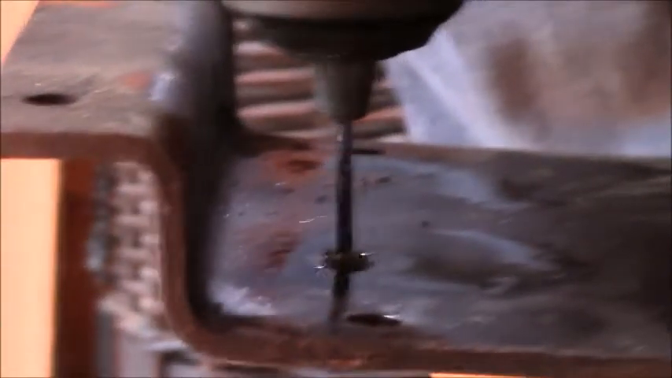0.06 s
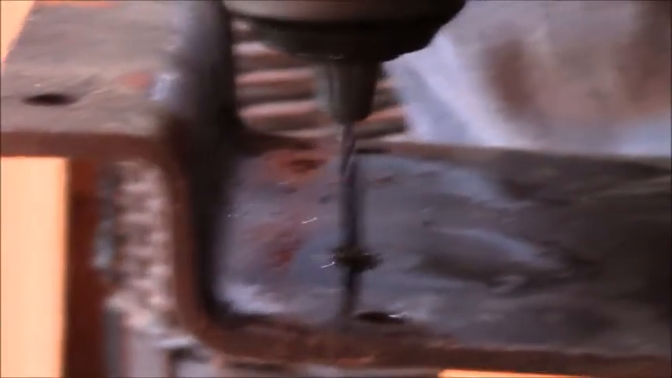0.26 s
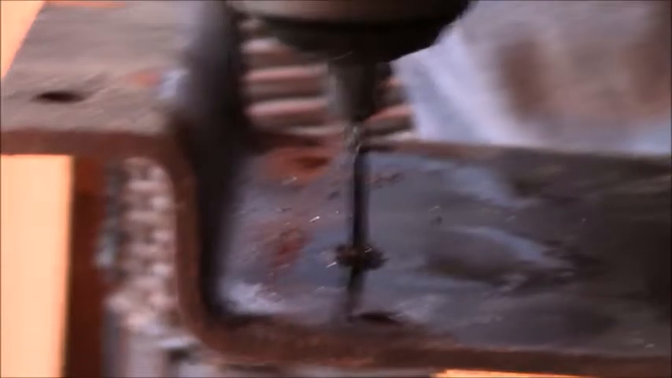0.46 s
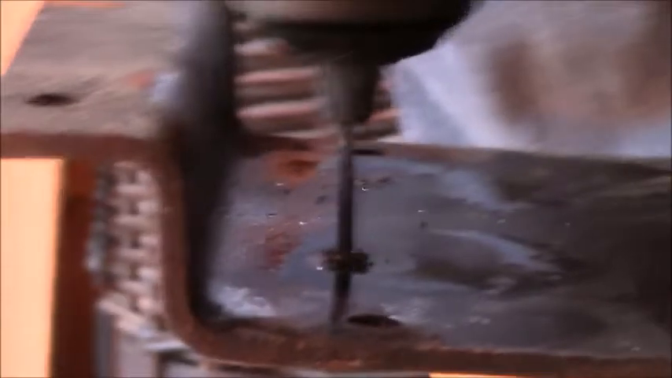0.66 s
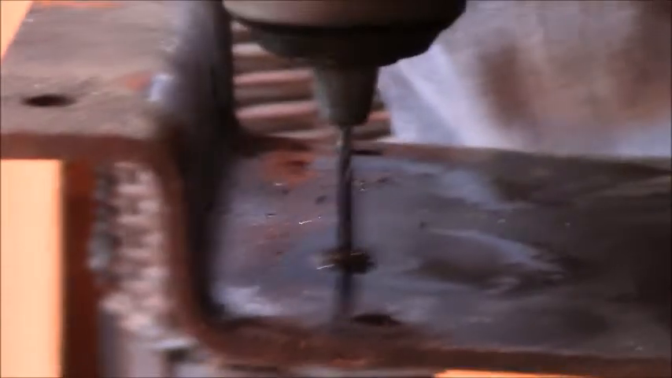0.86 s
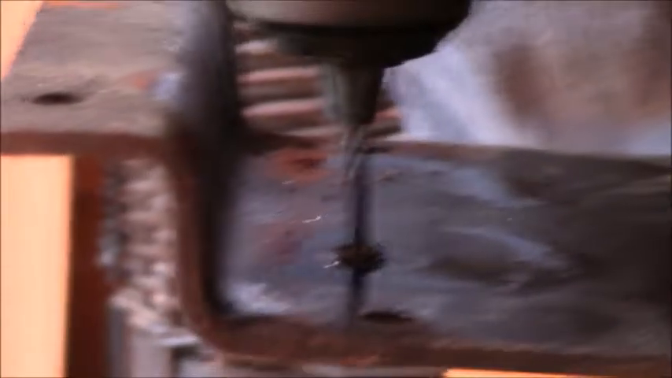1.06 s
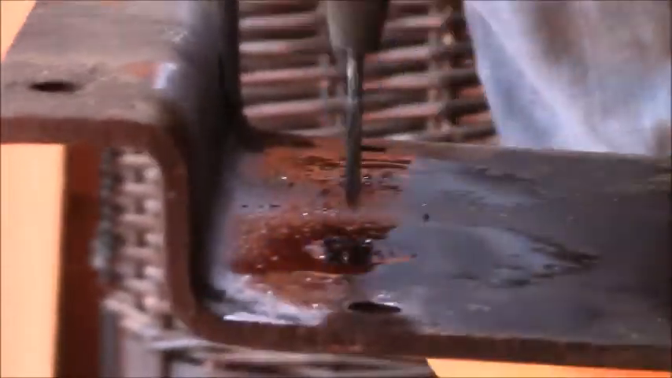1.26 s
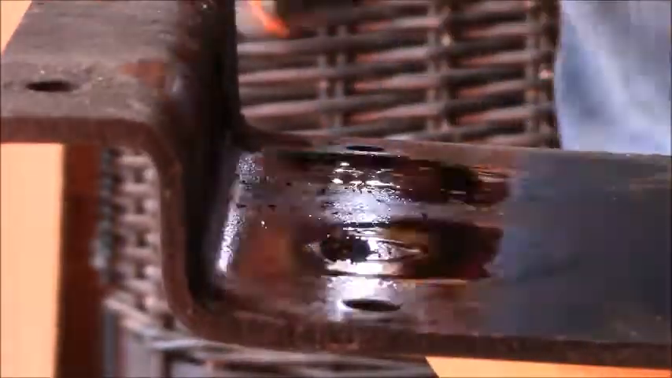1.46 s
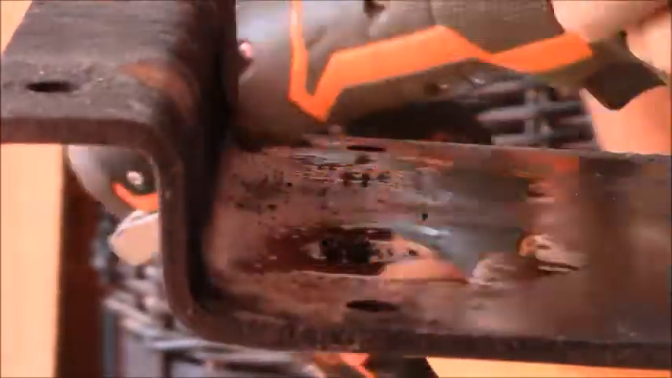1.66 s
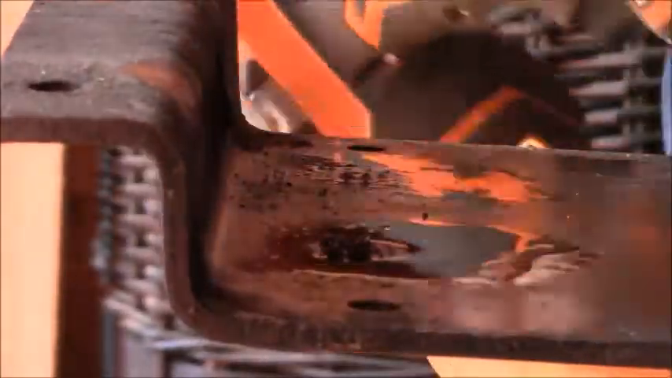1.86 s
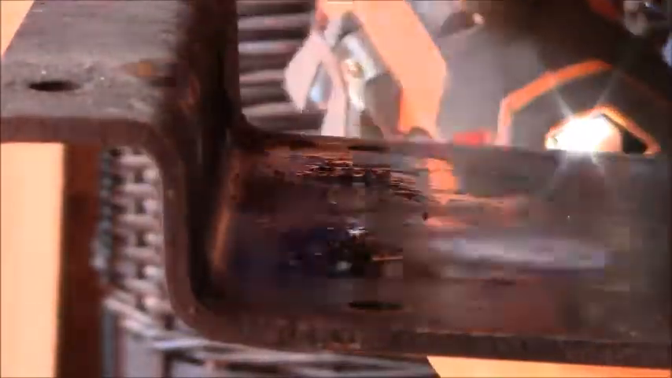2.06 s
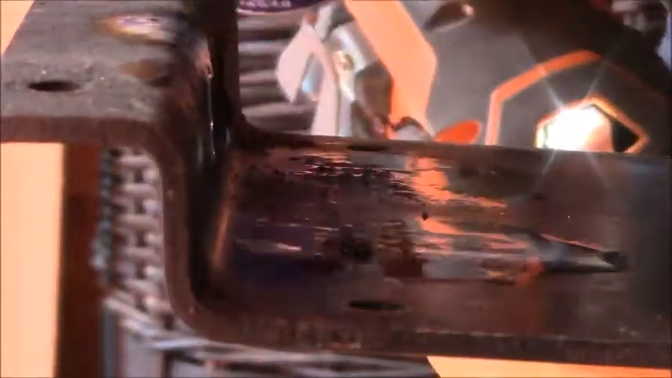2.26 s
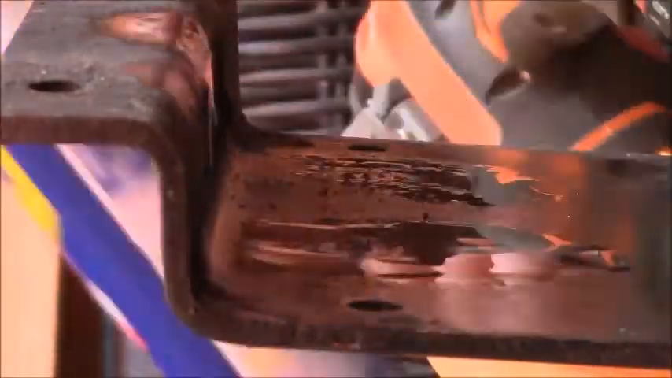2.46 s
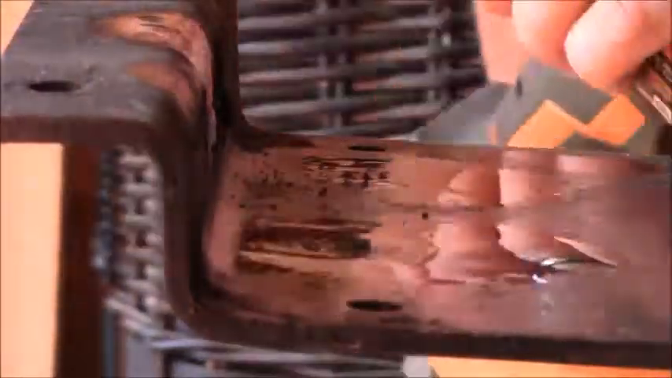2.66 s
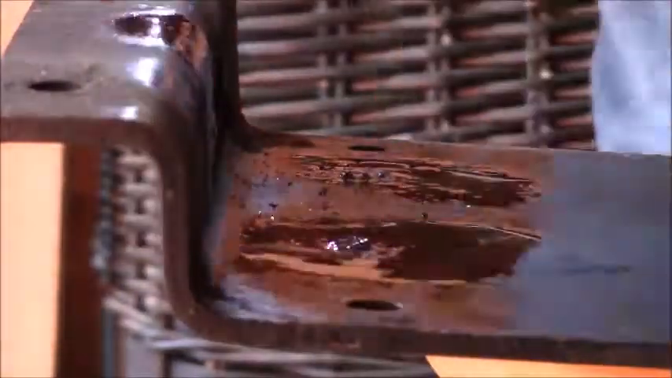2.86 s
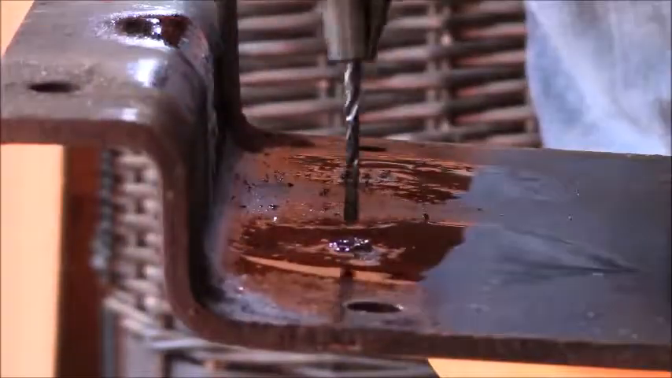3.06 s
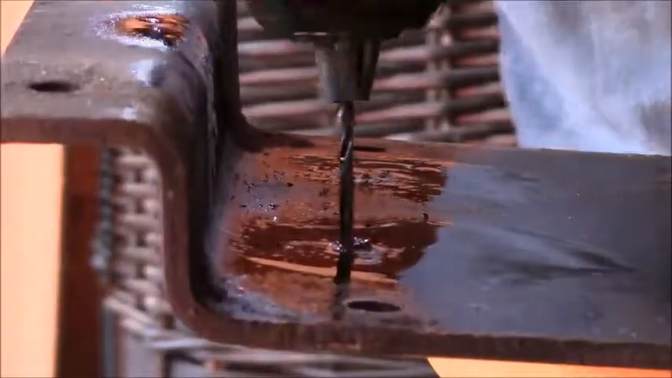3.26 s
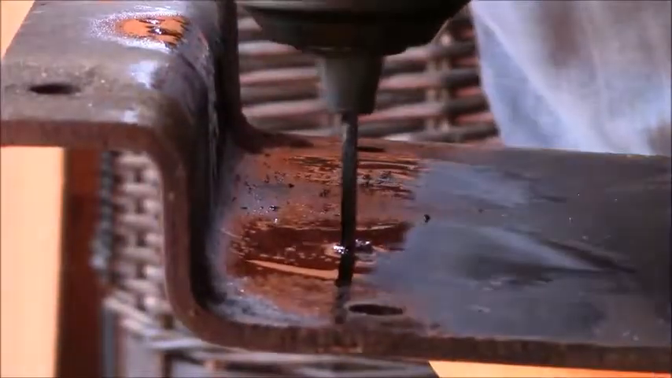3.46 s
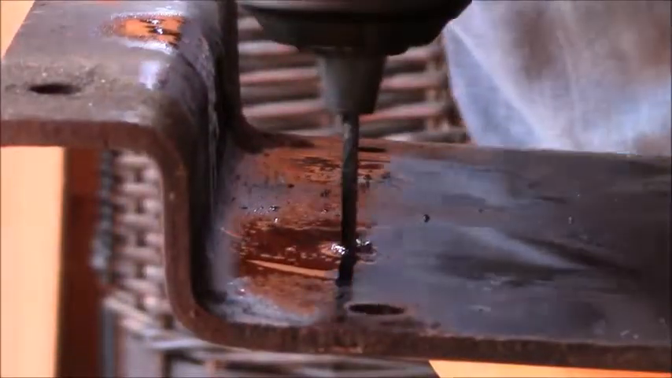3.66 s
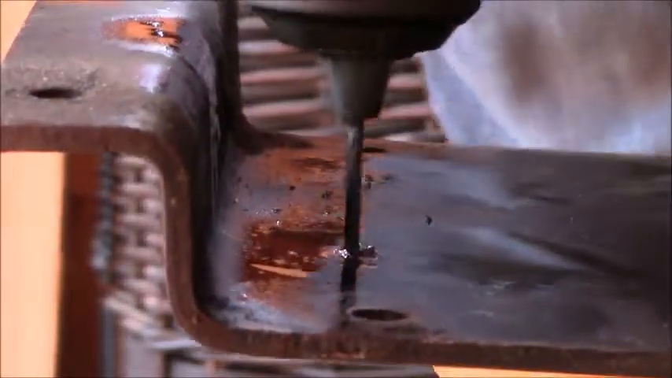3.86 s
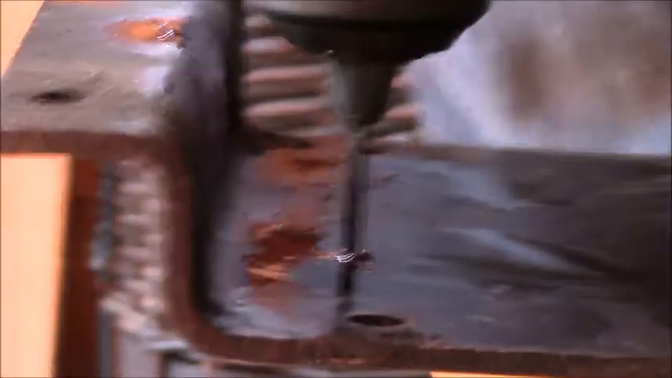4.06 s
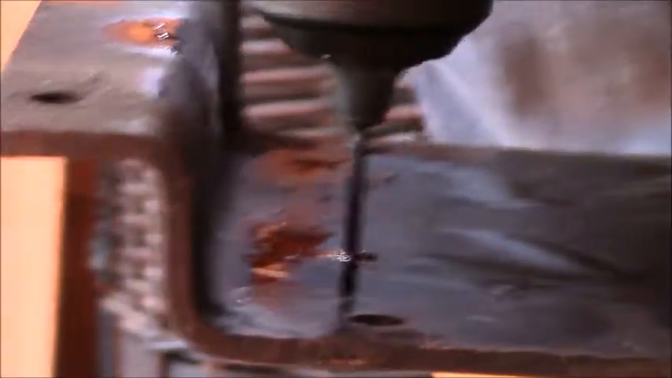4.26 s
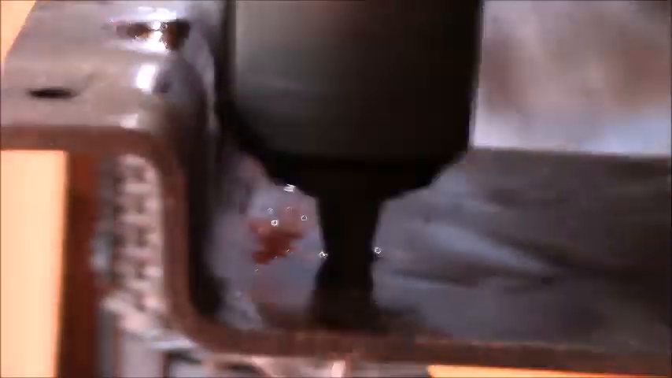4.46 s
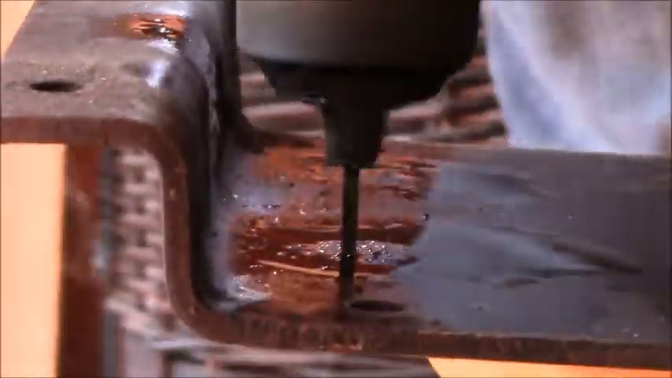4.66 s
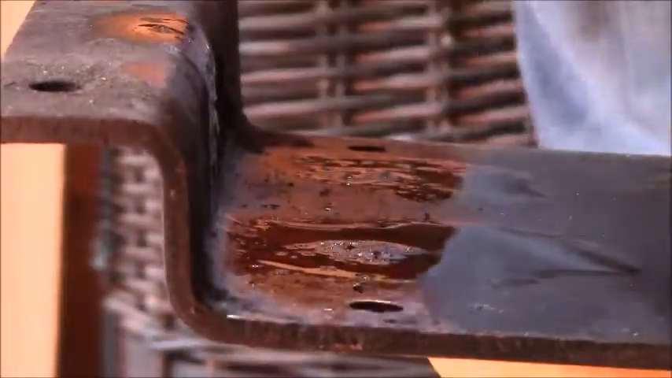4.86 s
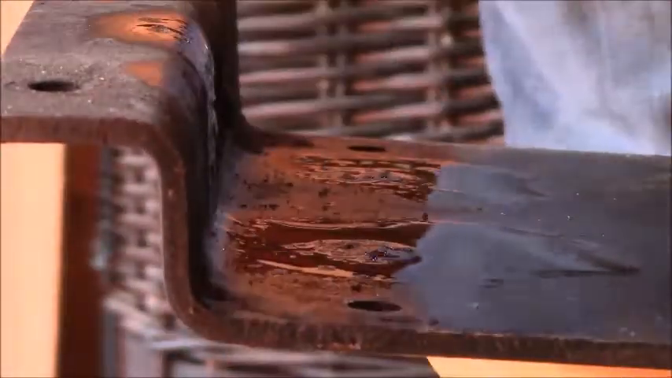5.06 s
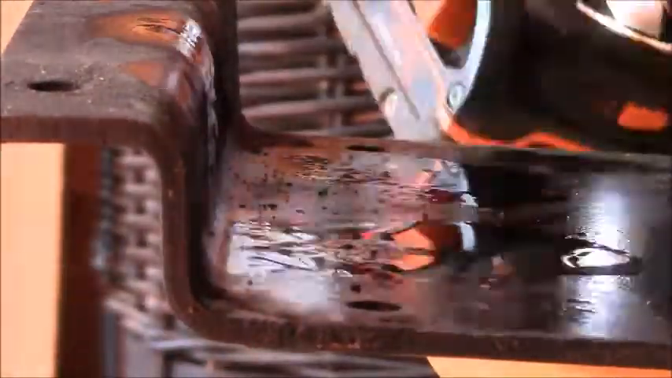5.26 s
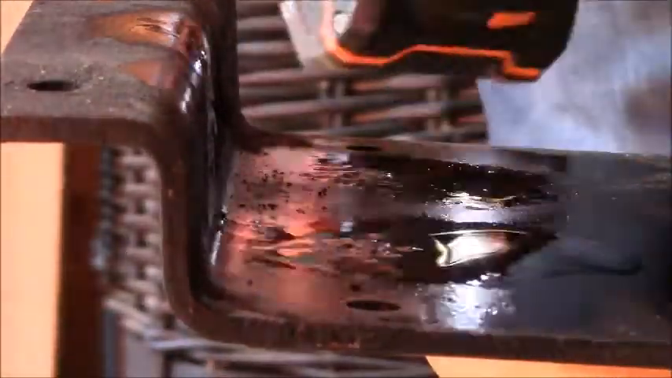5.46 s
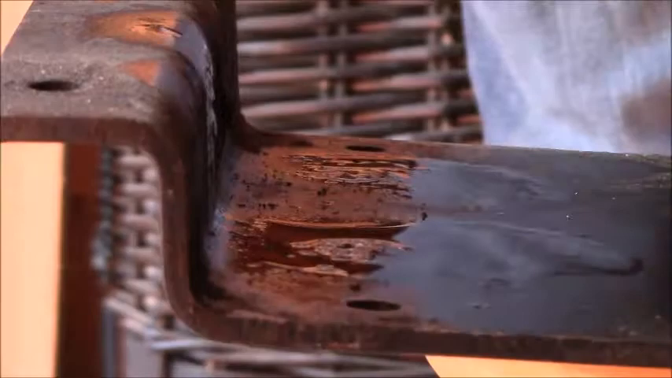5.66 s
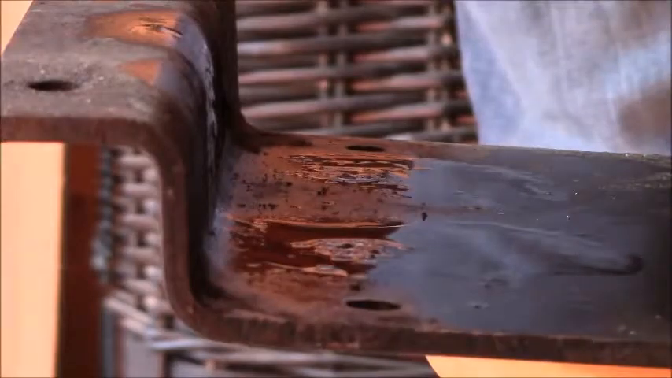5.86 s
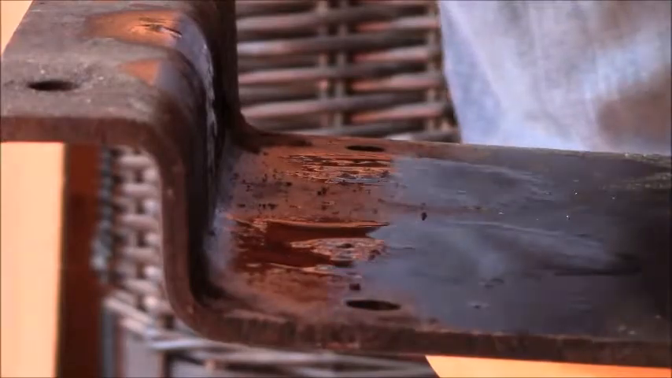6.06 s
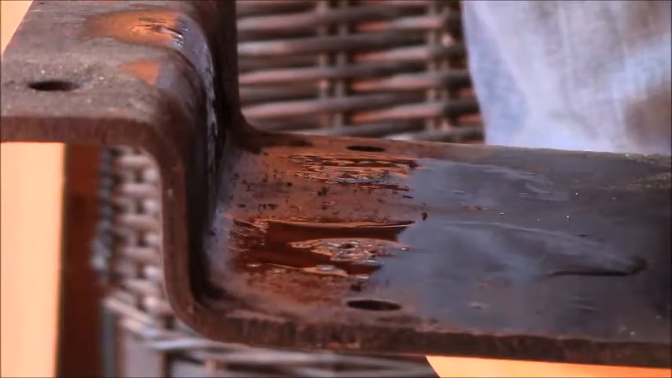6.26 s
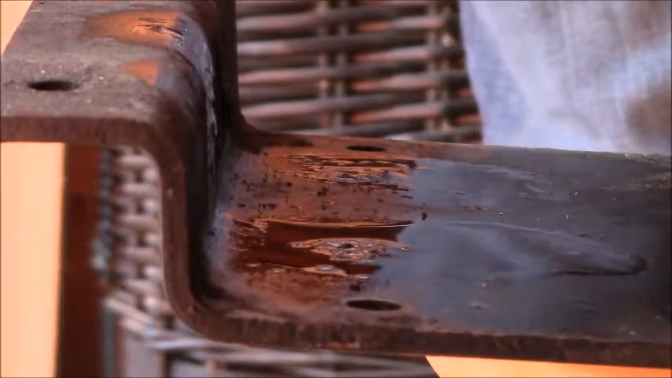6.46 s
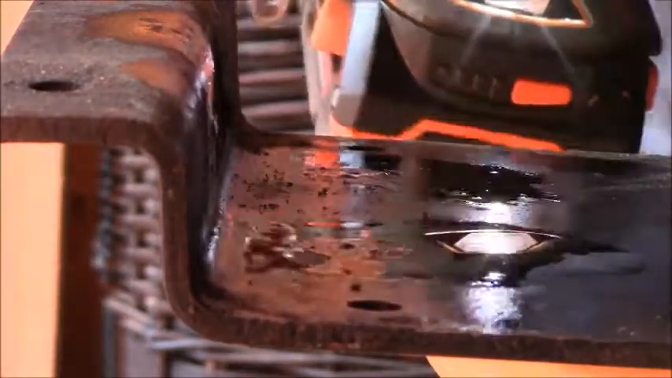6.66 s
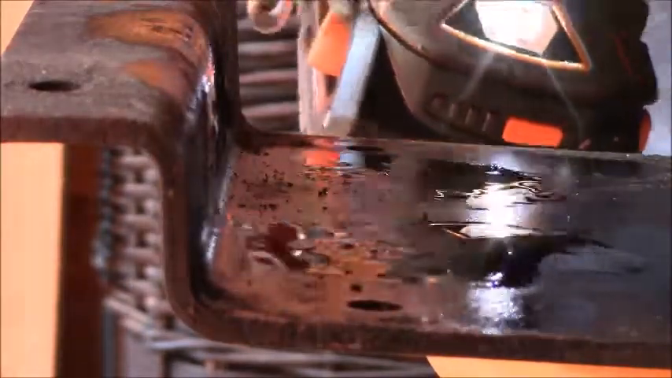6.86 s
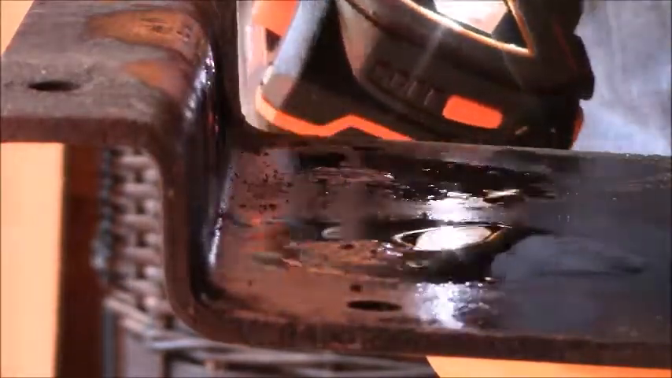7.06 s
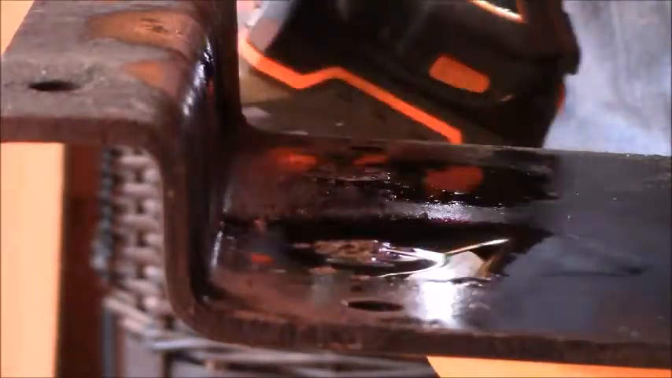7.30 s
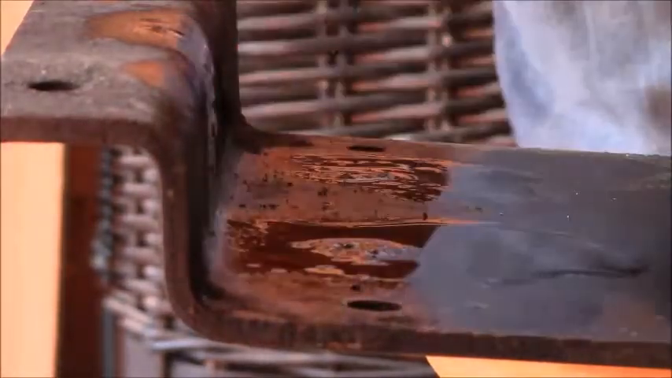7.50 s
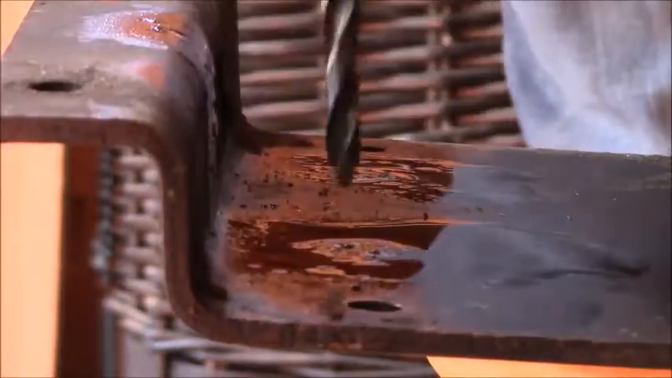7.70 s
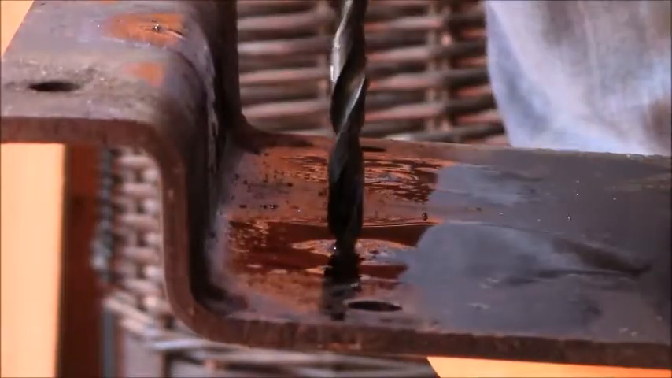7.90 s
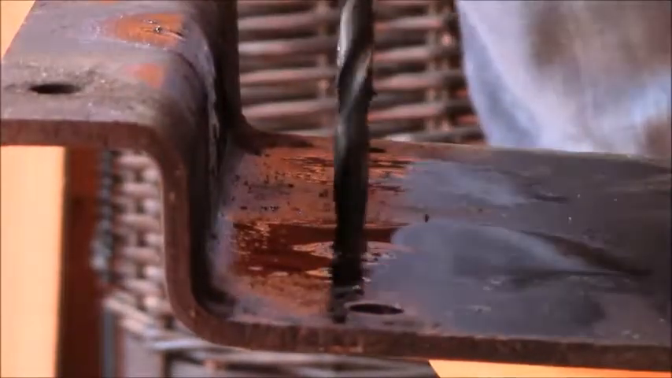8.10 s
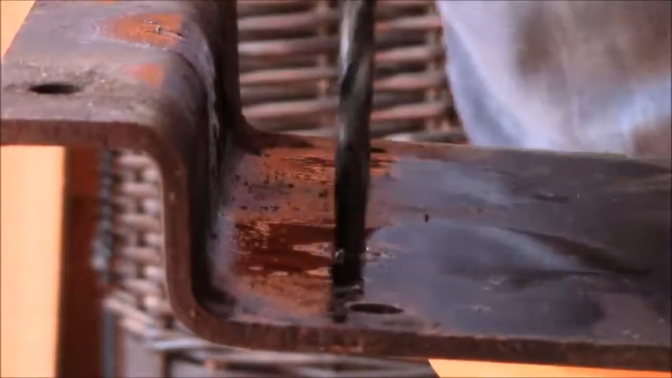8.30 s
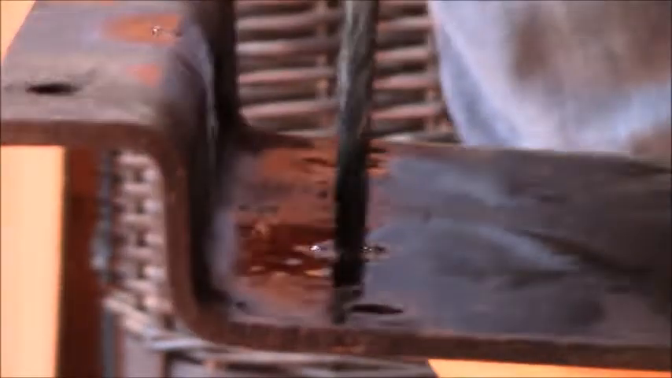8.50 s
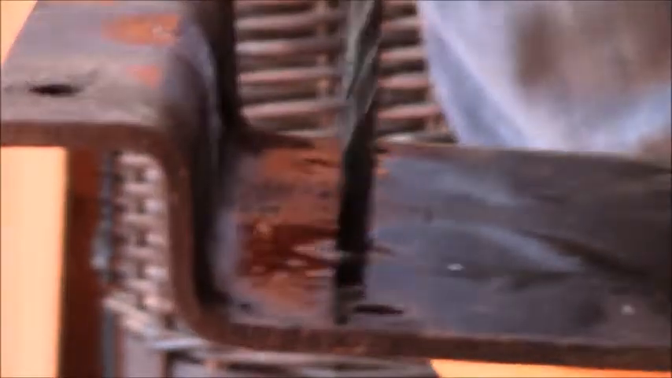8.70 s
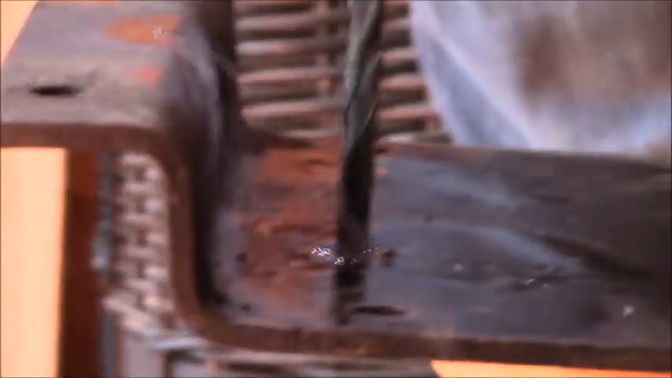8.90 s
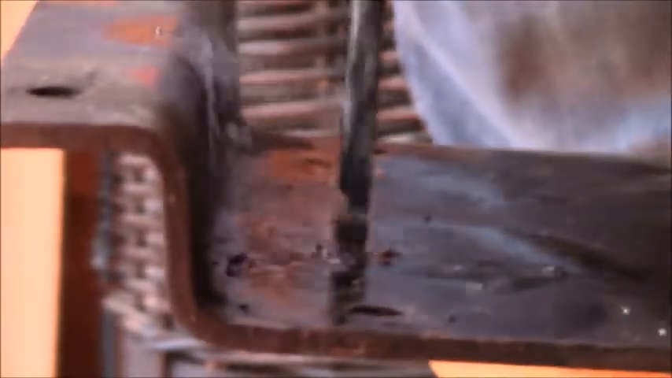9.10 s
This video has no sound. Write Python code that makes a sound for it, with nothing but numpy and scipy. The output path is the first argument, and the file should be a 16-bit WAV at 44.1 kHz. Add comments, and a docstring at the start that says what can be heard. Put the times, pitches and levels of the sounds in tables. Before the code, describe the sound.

Close microphone in a quiet workshop with a short bench reflection. High motor whine and fan hiss run at full speed, cut dead, and give way to knocks on steel, scratchy rubbing and small bright clicks. A second drilling ends in rough, booming jolts. Then come rod-like clinks, two brief spins of the free drill, chuck squeaks, more clicks, and a heavier bit juddering and singing in the plate.

```python
"""The listener first hears a cordless drill boring a steel plate: motor whine, gear hum, fan hiss and a judder.
Between holes the drill is laid down, its chuck is spun, ratcheted and refitted, and the plate is knocked.
Rotating parts are sums of sines locked to one shaft phase; hiss and friction are shaped noise;
struck parts are noise through resonances or decaying modes. A soft workshop hush lies under it all."""
import sys
import numpy as np
from scipy import signal
from scipy.fft import rfft, irfft, next_fast_len
from scipy.io import wavfile
from scipy.ndimage import uniform_filter1d, map_coordinates

SR = 44100
rng = np.random.default_rng(int(sys.argv[2]) if len(sys.argv) > 2 else 0)


def field_ratio(decibels):
    """Amplitude ratio for a level in dB (20 dB per decade); scalars and array-likes work."""
    return 10 ** (np.asarray(decibels, dtype=float) / 20)


def store_wav(level_fs):
    """Save 16-bit WAV to argv[1]."""
    pcm = np.round(np.clip(np.atleast_2d(level_fs), -1, 1) * 32767)
    wavfile.write(sys.argv[1], SR, pcm.T.astype(np.int16))


N = 403074
TOP_HZ = 15900

# Levels in the tables are relative unless called peak.
# Motor shaft speed: [t/s, speed/(rev/s)]
SHAFT_SPEED = [(0, 327.7), (.57, 326.9), (.95, 326.5), (1.14, 324.7), (1.2, 326.1), (1.28, 329.7),
               (1.335, 335.8), (1.35, 333), (1.37, 190), (3.38, 65), (3.455, 92), (3.49, 109), (3.52, 163),
               (3.54, 208), (3.57, 270), (3.6, 312), (3.62, 323), (3.655, 331), (3.695, 333.8),
               (3.76, 335.2), (3.855, 332.6), (3.935, 327.8), (4.015, 320.6), (4.2, 320), (4.34, 320.2),
               (4.46, 321), (4.495, 325.2), (4.575, 330.3), (4.615, 335.2), (4.655, 337.7), (4.74, 339.8),
               (4.815, 337.7), (4.885, 336), (4.905, 170), (5.18, 150), (5.215, 215), (5.245, 150),
               (5.76, 130), (5.775, 195), (5.79, 240), (5.81, 278), (5.83, 293), (5.85, 295), (5.89, 150),
               (6.97, 60), (7.3, 100), (8.07, 40), (8.25, 200), (8.36, 300), (8.4, 315.8), (8.45, 322),
               (8.62, 322.5), (8.75, 320.5), (8.9, 315.4), (8.97, 312), (9.14, 311)]
# Trigger pulls: [on t/s, off t/s, rise/s, early hiss level/dB, late hiss level/dB]
PULLS = [(-.1, 1.343, .03, -11.5, -12), (3.386, 4.89, 0.055, -12, -13), (5.176, 5.216, .003, -14, -13),
         (5.76, 5.852, .003, -12.5, -14), (6.968, 7.286, 0.12, -18, -15), (8.072, 9.2, 0.14, -8.5, -18)]
# State of each pull: 0 thin bit cutting, 1 breaking through, 2 spinning free, 3 thick bit cutting
STATE = [0, 1, 2, 2, 2, 3]
# Hiss colour, one table a pull, as the drill's angle and bit change: [f/Hz, level/dB]
HISS_COLOUR = [
    [(650, -59), (1100, -26), (1290, -9.5), (1760, -20), (2460, -16), (2550, -10.5), (2950, -12.5),
     (3120, -11), (4610, -10), (5050, -3.5), (7220, -5.5), (13200, 1.5), (16000, -2)],
    [(650, -39), (1100, -22), (1320, -10.5), (1440, -19.5), (1760, -18.5), (2250, -16.5), (2610, -10),
     (4510, -9), (5220, -1), (7470, -5.5), (10600, -0.5), (15000, 0), (16000, -0.5)],
    [(650, -75), (1100, -37), (1650, -25), (1820, -28), (2700, -12.5), (6310, -27), (8260, -3),
     (8940, -10.5), (16000, -21)],
    [(650, -49), (1100, -27), (1510, -22), (2280, -0.5), (5520, -8.5), (8170, 6), (10000, -1), (15100, 1),
     (16000, -7)],
    [(650, -61), (1100, -30), (1840, -25), (2730, -7.5), (3570, -11), (4130, -13.5), (6460, -12.5),
     (8940, -2), (10000, -9.5), (13700, -9.5), (16000, -8)],
    [(650, -32), (1100, -3), (1290, -32), (1660, -20.5), (1880, -12.5), (2300, -15.5), (3080, -5),
     (4360, -10), (4990, -5.5), (7060, -10.5), (9350, -3), (10100, -8), (16000, -5)],
]
# Unevenness of the hiss over time and frequency, one value a state: [rms depth/dB]
PATCHY_DB = [0.77, 1.5, 2.06, 1.1]
# Brief boost or dip of the hiss at switch-on, one value a state;
# a freely spinning drill starts with a burst: [level/dB]
ONSET_DB = [0, 2, 5, -3]
# Motor tones, with the planetary gear mesh at 9.8: [multiple of the shaft speed]
WHINE_ORDERS = [4, 8, 9.8, 12, 16, 20, 28, 32, 36, 40, 44, 44.9, 48, 80, 120]
# Strength of each motor tone, one row a state: [level/dB]
WHINE_DB = [
    [1, 2.5, -6, -10, 8, -1, -7, -5, -6, 8.5, 1, 0, -7, 0, 0],
    [-1, -3, -8, -14, 4.5, -1, -12, -14, -12, 5, -6, -5, -8, 3, 3],
    [0, 3, -5, -5, 2, -3, 0, -3, -3, 10, -5, -5, -5, 8, -5],
    [0, -5, -4, -20, -10, -3, -20, -20, -20, -4, -12, -10, -22, -20, -20],
]
# The same once the thin bit is through the plate and the motor runs unloaded: [level/dB]
UNLOADED_DB = [-1, 0, -8, -14, 5, -2, -10, 6, -8, 5, -7, -7, -9, 0, 0]
# Nominal depth of the motor tones under the hiss, one value a state: [depth/dB]
WHINE_UNDER_DB = [21, 16.5, 26, 23.5]
# Housing resonances that lift tones passing through: [f/Hz, width/Hz, lift/dB]
CASING = [(8300, 700, 7), (11500, 1200, 2)]
# Bit on the plate, one table a hole:
# [t/s, gear hum level/dB, plate drone level/dB, judder level/dB, share of judder locked to the gears 0-1]
BORING = [
    [(0, -35, -44, -36.5, 0.82), (.6, -32, -45, -36, 0.62), (.85, -33, -40, -33, 0.43),
     (1.1, -33.5, -36.5, -33, 0.34), (1.22, -32, -36, -35, .5), (1.3, -47, -57, -34, .6),
     (1.33, -49, -70, -68, 0.3)],
    [(3.37, -60, -60, -44, 0), (3.41, -55, -60, -29, 0), (3.56, -67, -62, -33, 0),
     (3.78, -63, -50, -38.5, .8), (3.86, -55, -50, -38, 0.5), (4.03, -33.5, -34.5, -40.5, 0.56),
     (4.22, -33, -33, -39.5, .4), (4.46, -41, -44, -35, 0.17), (4.56, -50, -40, -30, 0),
     (4.85, -65, -55, -47, 0.6), (4.89, -76, -76, -56, 0.6)],
    [(8.068, -70, -60, -33, 0), (8.12, -50, -50, -28.5, 0.04), (8.165, -53, -38, -16.5, 0.02),
     (8.22, -52, -40, -21, 0), (8.35, -61, -38, -22.5, 0.02), (8.4, -52, -19.5, -23.5, 0.95),
     (8.51, -46, -34.5, -26.5, 1), (8.68, -47, -28, -26, 0.97), (8.78, -48, -21, -27, 0.95),
     (9, -50, -29, -33.5, 0.93), (9.14, -52, -49, -36.5, .8)],
]
# Gear growl passed on to the plate, one table a state: [multiple of the carrier turn, level/dB]
GROWL = [
    [(2, -5), (3, -9.5), (5, 0.5), (6, -31), (8, -9.5)],
    [(2, -8.5), (3, -9), (5, -5.5), (6, -30), (8, -9.5), (9, -11), (10, -29)],
    [(2, 0)],
    [(2, -20), (5, -8.5), (6, -1), (7, -10.5), (8, -4.5), (9, -10), (10, -5.5), (11, -16), (12, -23),
     (14, -16), (15, -12.5), (16, -17), (17, -14.5), (20, -15), (21, -11)],
]
# Unsteadiness of the judder and of the plate drone, one value a state: [depth/dB]
JUDDER_FLUTTER_DB = [1.5, 1, 0, 1.5]
DRONE_FLUTTER_DB = [6, 4.5, 0, 1]
# Bit snagging on the rim, jolting the plate: [t/s, half length/s, judder level/dB, boom level/dB, boom f/Hz]
SNAGS = [(4.49, 0.011, -17, -9, 350), (4.518, 0.027, -26.5, -33, 418), (4.6, .015, -28, -36, 480),
         (4.678, 0.016, -41, -21.5, 450), (4.756, 0.008, -31, -34, 449), (4.81, 0.022, -26.5, -20.5, 455)]
# Resonances of the plate on its stand: [f/Hz, width/Hz, level/dB]
PLATE = [(209.4, 24, -6), (329, 29, -4.5), (448, 43, 3), (615, 86, -9), (727, 45, -3.5), (908, 86, -3),
         (1077, 103, -9), (1380, 340, -17), (1980, 420, -19), (2240, 220, -19.5), (3450, 620, -27.5)]
# Workshop hush: [t/s, level/dB], and its colour: [f/Hz, level/dB]
HUSH = [(1.4, -50.5), (1.55, -41), (1.75, -40), (2.3, -35), (2.43, -39), (2.76, -43.5), (3.22, -45),
        (3.3, -38.5), (4.94, -54), (5.05, -46), (5.11, -41), (5.25, -46), (5.74, -42.5), (5.9, -50.5),
        (6.01, -43), (6.5, -39.5), (6.64, -41), (6.82, -45.5), (7.4, -40), (7.5, -47), (7.78, -41),
        (7.9, -38), (8.05, -44.5)]
HUSH_COLOUR = [(12, -38), (20, -14.5), (65, 1.5), (319, -2), (446, -3), (499, -3), (780, -6), (1480, -9.5),
               (4420, -11.5), (14300, -19), (16000, -14)]
# Strokes of glove and swarf on steel: [middle t/s, length/s, level/dB, centre f/Hz]
STROKES = [(1.905, 0.083, -32.5, 10600), (2.1, 0.06, -37, 11800), (2.25, .05, -36, 12000),
           (2.347, .06, -33.5, 11800), (2.41, .07, -42, 7000), (2.81, 0.11, -53, 5000),
           (2.908, 0.065, -30.5, 7400), (3.285, .11, -40, 6200), (5.126, .06, -46, 9000),
           (5.23, 0.039, -51, 8400), (5.38, .05, -47, 9800), (5.523, 0.05, -39, 6200),
           (5.744, .06, -41, 6500), (6.487, 0.12, -48, 7000), (6.577, .06, -39, 9800),
           (6.635, .06, -40, 6900), (6.81, .08, -57, 8700), (7.35, 0.08, -31.5, 6200),
           (7.468, 0.13, -40, 10000), (7.59, 0.045, -48, 5900), (7.76, 0.083, -44.5, 4500),
           (7.923, 0.039, -38, 5000), (8.013, .05, -41, 7000)]
# Blows on the plate: [t/s, body peak level/dB, crack level/dB, contact time/s]
KNOCKS = [(1.553, -28, -17, 0.046), (1.668, -28, -25, .05), (1.685, -14.5, -14, 0.057),
          (1.758, -24, 7, 0.1), (2.613, -1, -5.5, .036), (2.649, -15.5, -19, .08),
          (2.685, -10.5, -4.5, 0.031), (2.717, -4.5, -30, 0.055), (2.736, -9, -18, 0.059),
          (2.744, -18.5, -23, .06), (3.176, -23, -21, 0.16), (3.235, -22, -30, .079),
          (3.26, -23.5, 5, 0.11), (3.352, -23, -12, 0.094), (3.443, -14, 9.5, .049),
          (3.462, -11, -14, .059), (4.482, -5, -25, .055), (4.599, -11.5, -18, 0.039),
          (4.747, -16.5, -5, .064), (4.828, -17, -20, 0.041), (5.078, -30, 4, .038),
          (7.795, -8.5, -12, 0.035), (7.815, -25.5, -25, 0.16), (7.853, -15.5, -7, 0.025),
          (7.868, -30, -25, .1)]
# Ticks of chuck, trigger and swarf: [t/s, peak level/dB, centre f/Hz, ring level/dB]
TICKS = [(1.753, -21, 4780, 10), (1.8467, -18, 9900, 2), (1.886, -13, 12000, 9), (1.9097, -5.5, 15000, 14),
         (1.918, -11, 10900, 4), (2.0749, -16, 12400, -8), (2.112, -13, 11700, 7), (2.228, -11, 12300, 7),
         (2.2324, -2, 12400, 5), (2.2614, -19, 12100, 5), (2.268, -15, 12000, 5), (2.3286, -11, 12200, 4),
         (2.3605, -12, 12000, 5), (2.4613, 3, 14200, -17), (2.4882, -19, 14000, 12),
         (2.9209, -2.5, 13300, 2), (3.2605, -20, 9500, -2), (3.2793, -15, 4080, 0),
         (3.3587, -11.5, 8400, -24), (4.9322, -16.5, 12500, 5), (4.973, -11.5, 9600, -7),
         (5.1098, -6, 10900, -14), (5.1656, -7, 10500, -9), (5.181, 1, 8170, -11), (5.1874, 2, 9090, -11),
         (5.1988, -3, 8320, -6), (5.4697, -16.5, 7740, 2), (5.714, -14.5, 7460, -1),
         (5.741, -18, 11000, -8), (5.7472, -12, 11900, -15), (5.7618, 5, 8250, -21), (6.497, -11, 7900, 2),
         (6.563, -17, 9530, -4), (6.5903, -7, 14600, 0), (6.6619, 2.5, 7160, -18), (6.6253, -24, 12000, -4),
         (6.7092, -30, 14000, -4), (6.725, -19, 10800, 9), (6.7414, -25, 10000, -4),
         (6.8284, -24, 9000, -4), (6.773, -16.5, 9200, -1), (6.8538, -22, 3070, 1.5),
         (6.913, -18, 12000, 10), (6.9173, -14, 9200, 13), (6.957, -14.5, 8180, -17),
         (7.0484, -1, 3200, -1.5), (7.3546, 1, 3070, 2.5), (7.3794, -13, 10800, -2),
         (7.4203, -3, 10800, -8), (7.4287, 1, 10700, -5), (7.4372, -6, 14500, 4), (7.4482, -0.5, 14300, 12),
         (7.4667, -0.5, 14800, 11), (7.4944, -6, 14800, -6), (7.5255, -2, 14800, 0), (7.541, -18, 9000, -4),
         (7.59, -27, 6000, -4), (7.8016, -21, 9540, -3), (7.9961, 6, 6400, -11), (8.0343, -14, 7900, -3),
         (8.075, -11, 14500, -4)]
# Modes of a loose steel drill bit: [f/Hz, level/dB, t60/s]
STEEL = [(1048, -20, .07), (2160, -11, .045), (3700, -14, .03), (4130, -18.5, .04), (4320, -3, .04),
         (7000, -26, .04), (9300, 0.5, .08), (9900, -5, .035), (11900, -2, .04), (12700, -6, .04),
         (13700, -20, .035), (15000, -8, .03)]
# Contacts of that loose bit: [t/s, level/dB, ring share 0-1]
CLINKS = [(3.1961, -26, 0.95), (3.2317, -24, 1), (5.2759, 0.5, 0.43), (5.2978, 1, 0.37), (5.3236, -4, 0.36),
          (5.3418, -15.5, 0.84), (5.5049, -47, 0.81), (5.524, -15.5, 0.8), (5.5522, -13, 0.66)]
# Chuck slipping in the hand: [t/s, f/Hz, level/dB]
SQUEAL = [(6.97, 7931, -38), (6.988, 8370, -25.5), (7.058, 9400, -30), (7.076, 9000, -38),
          (7.224, 8820, -23.5), (7.252, 8800, -28), (7.314, 7700, -32), (7.352, 8069, -33),
          (7.36, 8034, -40)]
# Thin wavering streaks shed by the slipping chuck: [t/s, level of all together/dB]
STREAKS = [(7.04, -45), (7.06, -31), (7.2, -35), (7.28, -30.5), (7.3, -45)]
# Resonances of the thick bit: [f/Hz, width/Hz, level/dB], and its singing as it cuts: [t/s, level/dB]
BIT = [(1900, 36, -29), (3200, 48, -19), (3740, 120, -29), (5180, 350, 2.5), (5420, 30, 1),
       (9520, 210, 3.5), (10800, 200, -1), (11600, 59, 0), (12400, 100, -17), (13000, 35, -15),
       (15200, 310, -12), (14800, 82, 1)]
SINGING = [(8.1, -68), (8.316, -25), (8.426, -21), (8.6, -19.5), (8.8, -19), (8.97, -20.5), (9.02, -24),
           (9.05, -20.5), (9.14, -25)]

GEAR, SPINDLE = .28, .08  # turns of the planet carrier and of the bit per motor turn


def unit(x):
    """Normalisation to an rms of 1."""
    return x / np.sqrt(np.mean(x ** 2) + 1e-20)


def along(points, hz):
    """Interpolation of (f/Hz, value) points on a logarithmic frequency axis."""
    f, v = np.transpose(points)
    return np.interp(np.log(hz + 1), np.log(f + 1), v)


def curves(rows, start=0, stop=N):
    """Linear interpolation in time: one value a sample for each column after t/s."""
    s, *cols = np.transpose(rows)
    return [np.interp(np.arange(start, stop) / SR, s, c) for c in cols]


def stretch(rows):
    """First sample, last sample and window of a table's span, soft-edged except at the scene's own ends."""
    start, stop = max(int(rows[0][0] * SR), 0), min(int(rows[-1][0] * SR), N)
    k = np.arange(stop - start)
    from_start = k + (start == 0) * SR
    to_end = k[::-1] + (stop > N - 99) * SR
    return start, stop, np.clip(np.minimum(from_start, to_end) / 200, 0, 1)


def wobble(n, rate):
    """Random modulation: a smooth curve through rate random knots a second."""
    knots = rng.standard_normal(int(n * rate / SR) + 4)
    return map_coordinates(knots, [np.arange(n) * rate / SR])


def filtered(x, response):
    """Linear filtering: the spectrum multiplied by a complex response of frequency."""
    m = next_fast_len(x.shape[-1] + 2048)
    return irfft(rfft(x, m) * response(np.fft.rfftfreq(m, 1 / SR)), m)[..., :x.shape[-1]]


def modes(table):
    """Superposition of damped resonances of alternating sign, as a causal frequency response."""
    return lambda f: sum((-1) ** k * field_ratio(db) * 1j * f * width / (centre * centre - f * f + 1j * f * width)
                         for k, (centre, width, db) in enumerate(table))


def coloured(n, spectrum):
    """Random noise of rms 1 with a prescribed spectrum."""
    return unit(filtered(rng.standard_normal(n), lambda hz: field_ratio(along(spectrum, hz))))


def trigger(pull, t):
    """Switching transient: hiss level of a pull with a quick rise, a slow drift, then the brake."""
    on, off, rise, early_db, late_db = pull
    rising_db = -10 * np.exp(-3 * (t - on) / max(rise, .001))
    braking_db = 1098 * np.clip(t - off, 0, None)  # 1098 dB/s
    return np.interp(t, [on, off], [early_db, late_db]) + rising_db - braking_db


def patchy(x, depth_db):
    """Spectral modulation of noise: drifting patches of more and less energy."""
    z = signal.stft(x, nperseg=256)[2]
    field = uniform_filter1d(rng.standard_normal(z.shape), size=3, axis=0)
    field = uniform_filter1d(field, size=14, axis=1)
    return signal.istft(z * field_ratio(depth_db * unit(field)), nperseg=256)[1][:len(x)]


def tones(phase, multiples, levels_db, flutter_db, rate):
    """Line spectrum of one turning part: slightly unsteady multiples, whose level may be a curve."""
    n = len(phase)
    out = 0
    for k, db in zip(multiples, levels_db):
        flutter = wobble(n // 16 + 1, 16 * rate).repeat(16)[:n]  # held for 16 samples
        out = out + field_ratio(db + flutter_db * flutter) * np.sin(k * phase + rng.uniform(0, 2 * np.pi))
    return out


def fan_hiss(pull, colour, state, t, shaft):
    """Broadband flow noise, throbbing with the bit and the shaft and gritty with brush sparks."""
    n = len(t)
    onset_db = ONSET_DB[state] * np.exp(-(t - pull[0]) / 0.0059)  # dies away within milliseconds
    hiss_db = trigger(pull, t) + 0.2 * wobble(n, 13) + onset_db
    turning_db = .5 * np.sin(SPINDLE * shaft) + 0.22 * np.sin(shaft)
    throb = field_ratio(turning_db + 0.25 * wobble(n, 38.6) + 0.38 * wobble(n, 900))
    return field_ratio(hiss_db - 1.5) * unit(throb * patchy(coloured(n, colour), PATCHY_DB[state]))


def motor_whine(pull, state, t, speed, shaft):
    """Tones locked to shaft rotation, harmonics of the motor plus the gear mesh at 9.8 turns, lifted where they
    cross the resonances of the housing."""
    slow_db = 20 * np.log10(np.clip(speed / 310, .01, 1))
    through = (state == 1) & (t > 4.52)
    levels_db = []
    for k, loaded_db, free_db in zip(WHINE_ORDERS, WHINE_DB[state], UNLOADED_DB):
        hz = k * speed
        lift_db = sum(db / (1 + ((hz - centre) / width) ** 2) for centre, width, db in CASING)
        # low orders only clear near full speed; high ones stay as thin treble streaks
        slope = 2 + .3 * k if k < 30 else .5
        silent = (hz > TOP_HZ) | (k > 30) & (hz < 6800)
        levels_db.append(np.where(through, free_db, loaded_db) + lift_db + slope * slow_db - 99 * silent)
    whine_db = trigger(pull, t) - WHINE_UNDER_DB[state]
    return field_ratio(whine_db + 1.5) * tones(shaft, WHINE_ORDERS, levels_db, flutter_db=-0.74, rate=54)


def shaken_plate(hole, state, t, start, carrier):
    """Forced vibration through the bit: gear hum, plate drone, snag booms and judder."""
    n = len(t)
    hum_db, drone_db, judder_db, locked = curves(hole, start, start + n)
    locked = np.clip(locked, 0, 1)
    drone_db = drone_db + DRONE_FLUTTER_DB[state] * wobble(n, 30.2)
    jolts, booms = np.zeros((2, n))
    for s, half, jolt_db, boom_db, hz in SNAGS:
        pulse = np.exp(-((t - s) / half) ** 2)
        jolts += pulse * field_ratio(jolt_db)
        booms += pulse * field_ratio(boom_db) * np.sin(2 * np.pi * hz * t)
    shake = field_ratio(judder_db + JUDDER_FLUTTER_DB[state] * wobble(n, 30.34)) + jolts
    hum = field_ratio(hum_db) * np.sin(carrier)
    # the fourth gear order sits on a plate resonance
    drone = field_ratio(drone_db) * np.sqrt(locked) * np.sin(4 * carrier)
    # a bit that bites passes on the gear lines; a skating bit gives lumpy noise
    growl = tones(carrier, *np.transpose(GROWL[state]), flutter_db=3.0, rate=18.44)
    skate = rng.standard_normal(n) * field_ratio(0.8 * wobble(n, 71.56))
    skate = filtered(skate, lambda hz: modes(PLATE)(hz) / (1 + 1j * hz / 1400) ** 2)
    judder = np.sqrt(locked) * unit(growl) + np.sqrt(1 - locked) * unit(skate)
    return hum + drone + booms + shake * judder


def drill():
    """Common-shaft excitation: one phase drives hiss, whine and plate in each pull of the trigger."""
    out = np.zeros(N)
    holes = iter(BORING)
    for pull, colour, state in zip(PULLS, HISS_COLOUR, STATE):
        start, stop, window = stretch([pull[:1], [pull[1] + .045]])
        n, t = stop - start, np.arange(start, stop) / SR
        speed = curves(SHAFT_SPEED, start, stop)[0]
        shaft = 2 * np.pi * np.cumsum(speed * (1 + .0011 * wobble(n, 70))) / SR
        sound = fan_hiss(pull, colour, state, t, shaft) + motor_whine(pull, state, t, speed, shaft)
        if state != 2:  # spinning free, nothing reaches the plate
            sound += shaken_plate(next(holes), state, t, start, GEAR * shaft)
        out[start:stop] += window * sound
    return out


def hush():
    """Diffuse background: far, smooth workshop noise, almost alike in both channels."""
    level = field_ratio(curves(HUSH)[0] + wobble(N, 7))
    mid = coloured(N, HUSH_COLOUR)
    side = field_ratio(-25.5) * coloured(N, [(50, -8), (900, -18), (1500, -19.5), (16000, -26)])
    return level * np.array([mid + side, mid - side])


def rubbing():
    """Sliding friction: clumped scratchy noise; each stroke mixes a dull and a bright surface by its pitch."""
    t = np.arange(N) / SR
    grains = rng.standard_normal((2, N)) * field_ratio(2.2 * wobble(N, 150) + 2.5 * wobble(N, 700))
    dull_modes = modes([(4500, 3500, 0), (8500, 2500, -3)])
    dull = unit(filtered(grains[0], lambda hz: dull_modes(hz) * hz / (hz + 3000)))
    bright = unit(filtered(grains[1], lambda hz: modes([(11500, 6000, 0)])(hz) ** 2))
    swells = [(field_ratio(db) * np.exp(-(2 * (t - s) / length) ** 2), hz) for s, length, db, hz in STROKES]
    # faint handling that never quite stops
    swells.append((field_ratio(-55 + 1.1 * wobble(N, 5.9)), 5140))
    dull_power, bright_power = np.zeros((2, N))
    for gain, hz in swells:
        share = np.clip((hz - 4000) / 7000, 0, 1)
        dull_power += gain ** 2 * (1 - share)
        bright_power += gain ** 2 * share
    return np.sqrt(dull_power) * dull + np.sqrt(bright_power) * bright


def bench(x):
    """Early reverberation: a short, delayed, decaying answer from the bench and walls."""
    t = np.arange(SR // 5) / SR
    tail = rng.standard_normal(len(t)) * field_ratio(-60 * t / 0.038)
    return signal.fftconvolve(np.pad(x, (130, 0)), tail / np.linalg.norm(tail))[:N]


def knocks():
    """Impact excitation: contact noise rings the plate; harder blows favour upper modes; a bright crack is added."""
    out, t = np.zeros(N + SR), np.arange(SR // 6) / SR
    for s, db, crack_db, contact in KNOCKS:
        tilt = 5.5 + 0.4 * db  # dB per octave
        push, grit = rng.standard_normal((2, len(t)))
        fade = field_ratio(-60 * t / max(contact, .004))
        struck = [(hz, width, level + tilt * np.log2(hz / 440)) for hz, width, level in PLATE]
        blow = (abs(push) * (t < .001) * 0.35 + push) * fade
        body = filtered(blow, lambda hz: modes(struck)(hz) * 1j * hz / (300 + 1j * hz))
        crack = filtered(grit, lambda hz: 1j * hz / (1800 + 1j * hz) / (1 + 1j * hz / 7000)) * fade ** 1.1
        out[round(s * SR):][:len(t)] += field_ratio(db) * (body / abs(body).max() + field_ratio(crack_db - 6.5) * crack)
    return out[:N]


def ticks():
    """Impulse response of small parts: a sharp broad click, then a short ring around the part's own pitch."""
    out, t = np.zeros(N + SR), np.arange(SR // 16) / SR
    # each rubbing stroke sheds a faint tick as well
    faint = [(s + length * (u - .5), -32 + 8 * (v - .5), hz, -5)
             for (s, length, _, hz), (u, v) in zip(STROKES, rng.random((len(STROKES), 2)))]
    for s, db, centre_hz, ring_db in TICKS + faint:
        snap, grit = rng.standard_normal((2, len(t)))
        ring = unit(filtered(grit, modes([(centre_hz, 0.093 * centre_hz, 0)]))) * field_ratio(-60 * t / 0.012)
        snap = snap * field_ratio(3.5 - 60 * t / 0.0045)
        click = filtered(snap + field_ratio(ring_db) * ring, lambda hz: (1j * hz / (1700 + 1j * hz)) ** 4)
        out[round(s * SR):][:len(t)] += field_ratio(db) * click / abs(click).max()
    return out[:N]


def clinks():
    """Modal vibration: every contact rings the steel rod's modes at new strengths, over a short crack."""
    out, t = np.zeros(N + SR), np.arange(SR // 8) / SR
    for s, db, share in CLINKS:
        ring = sum(field_ratio(level + rng.normal(0, 2.0) - 60 * t / t60) * np.sin(2 * np.pi * hz * t)
                   for hz, level, t60 in STEEL)
        ring *= field_ratio(4.0 * wobble(len(t), 590))  # it rattles against its neighbours
        crack = np.diff(rng.standard_normal(len(t) + 1)) * field_ratio(-60 * t / 0.019)
        out[round(s * SR):][:len(t)] += field_ratio(db - 13.0) * (share * ring + 1.15 * crack)
    return out[:N]


def squeal():
    """Friction oscillation: a thin tone, unsteady in pitch and level."""
    start, stop, window = stretch(SQUEAL)
    hz, db = curves(SQUEAL, start, stop)
    n = stop - start
    phase = 2 * np.pi * np.cumsum(hz + 90 * wobble(n, 199)) / SR
    out = np.zeros(N)
    out[start:stop] = window * field_ratio(db + 4.5 + 2.4 * wobble(n, 153)) * np.sin(phase)
    return out


def streaks(count=14):
    """Many weak friction oscillations, whose tones wander and come and go."""
    start, stop, window = stretch(STREAKS)
    n = stop - start
    lines = np.zeros(n)
    for hz in 2400 * field_ratio(rng.uniform(0, 9.9, count)):
        wandering_hz = hz * (1 + 0.034 * wobble(n, 3) + 0.0067 * wobble(n, 147))
        lines += field_ratio(3.5 * wobble(n, 25)) * np.sin(2 * np.pi * np.cumsum(wandering_hz) / SR)
    out = np.zeros(N)
    out[start:stop] = window * field_ratio(curves(STREAKS, start, stop)[0]) * unit(lines)
    return out


def bit_song():
    """Resonance under repeated excitation: chips breaking at both lips each turn keep the bit ringing."""
    start, stop, window = stretch(SINGING)
    n = stop - start
    turn = 2 * np.pi * SPINDLE * np.cumsum(curves(SHAFT_SPEED, start, stop)[0]) / SR
    burst_db = 0.62 * np.sin(turn) + 0.98 * np.sin(2 * turn) + 0.98 * wobble(n, 120.7)
    chips = rng.standard_normal(n) * field_ratio(burst_db)
    level = field_ratio(curves(SINGING, start, stop)[0] + 3.5 + 1.6 * wobble(n, 45))
    out = np.zeros(N)
    out[start:stop] = window * level * unit(filtered(chips, modes(BIT)))
    return out


def scene():
    """Superposition: near sources are central; the bench answers the handling more than the motor."""
    motor = drill() + bit_song()
    handling = squeal() + streaks() + knocks() + clinks() + ticks() + rubbing()
    return motor + handling + bench(field_ratio(-22) * motor + field_ratio(-9.5) * handling) + hush()


def low_pass(x):
    """Removes everything above the highest recorded frequency."""
    return signal.sosfilt(signal.butter(12, 17030, fs=SR, output="sos"), x)


def record(dry):
    """Band limitation, then clipping at full scale."""
    mix = np.clip(filtered(dry, lambda hz: hz < TOP_HZ), -1, 1)
    return low_pass(mix)


dry = scene()
out = record(dry)
store_wav(out)
```